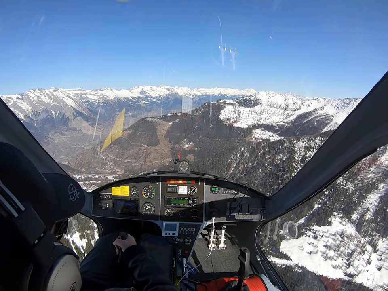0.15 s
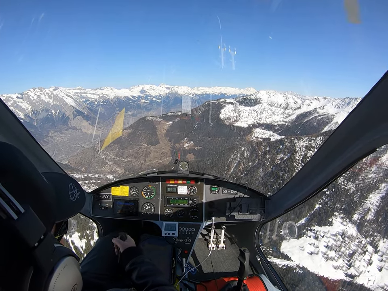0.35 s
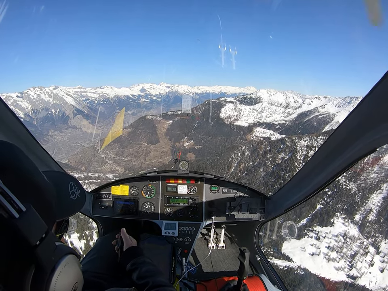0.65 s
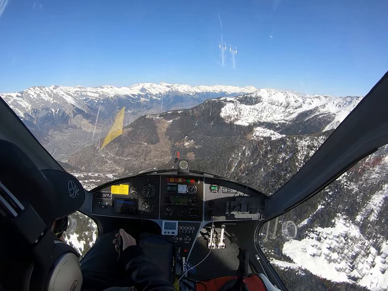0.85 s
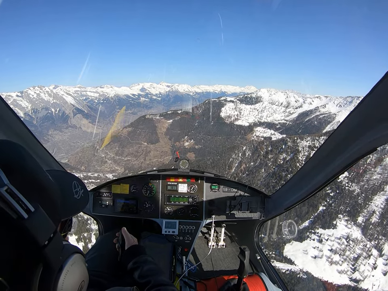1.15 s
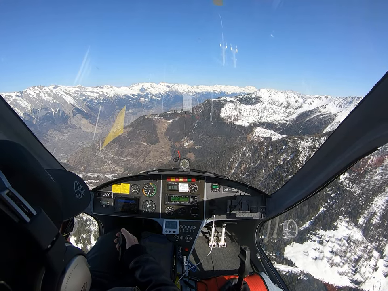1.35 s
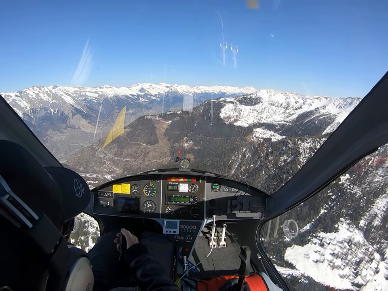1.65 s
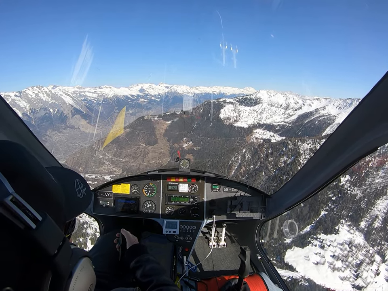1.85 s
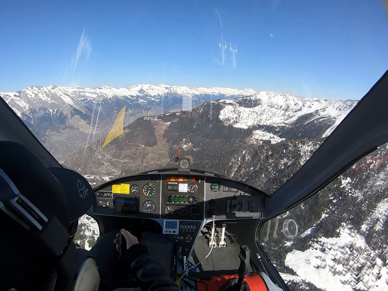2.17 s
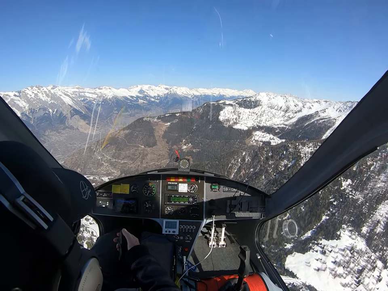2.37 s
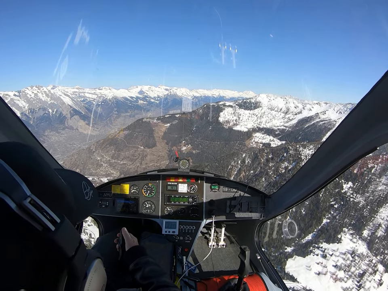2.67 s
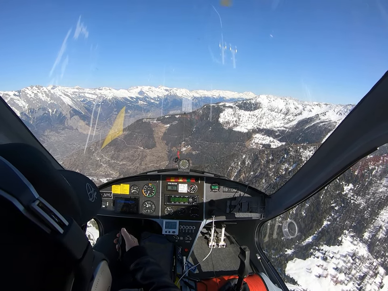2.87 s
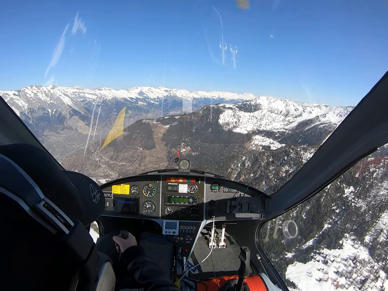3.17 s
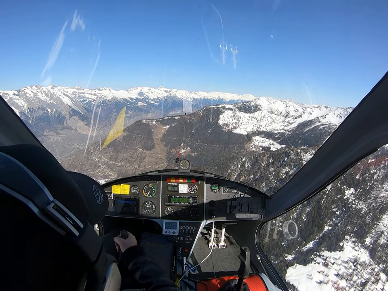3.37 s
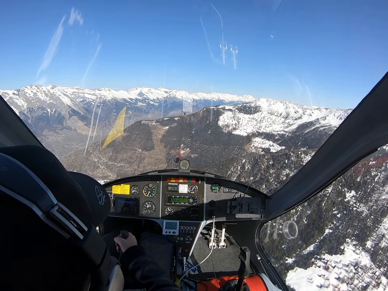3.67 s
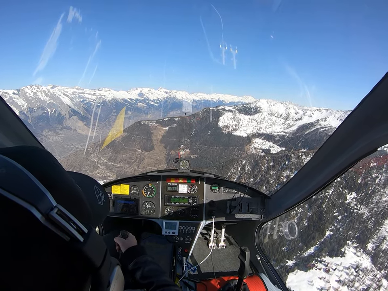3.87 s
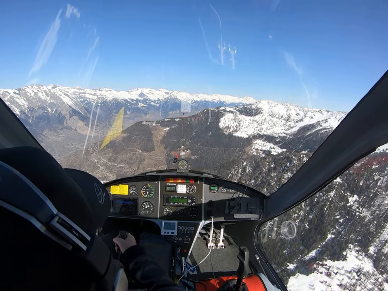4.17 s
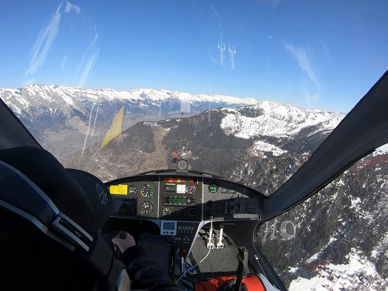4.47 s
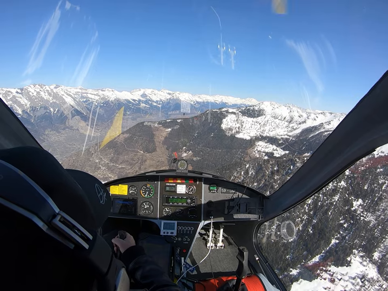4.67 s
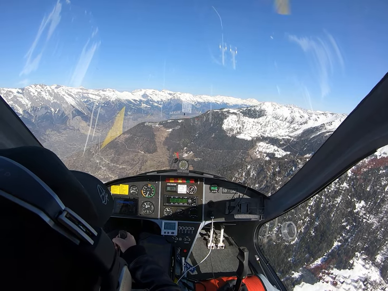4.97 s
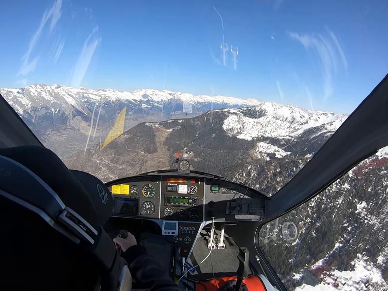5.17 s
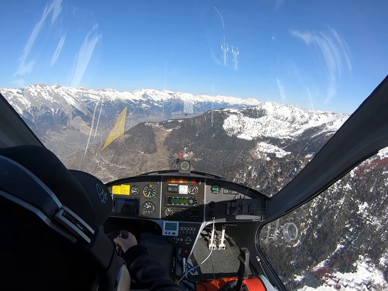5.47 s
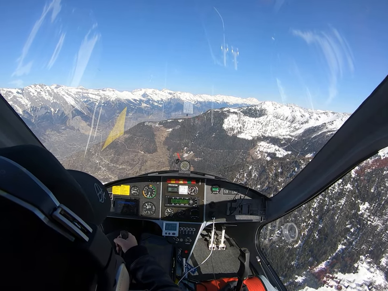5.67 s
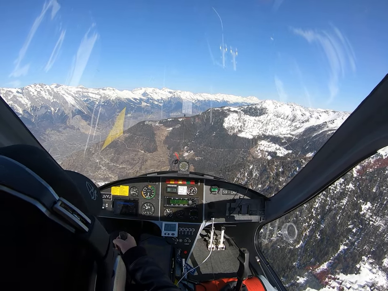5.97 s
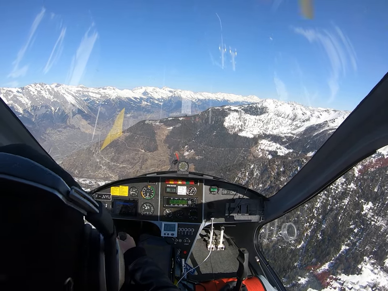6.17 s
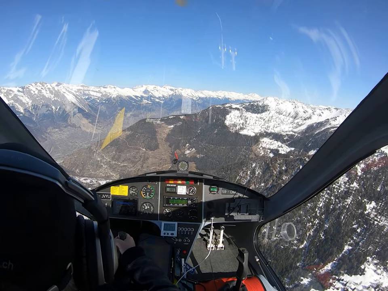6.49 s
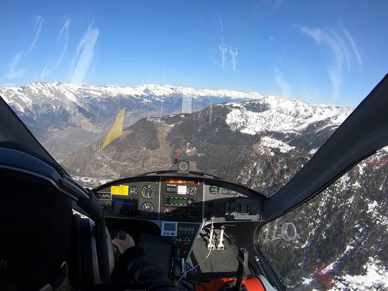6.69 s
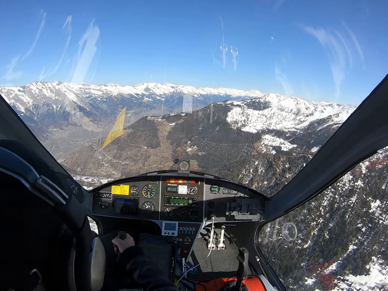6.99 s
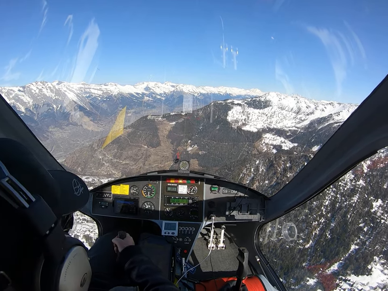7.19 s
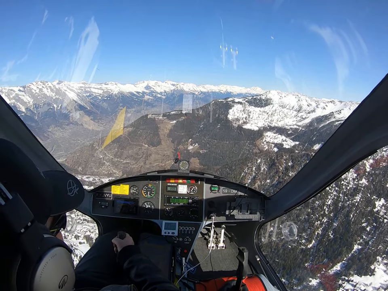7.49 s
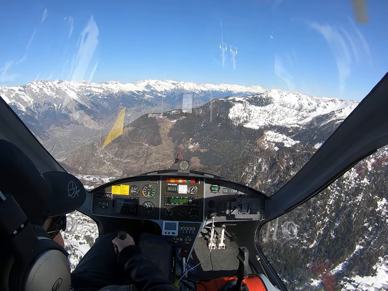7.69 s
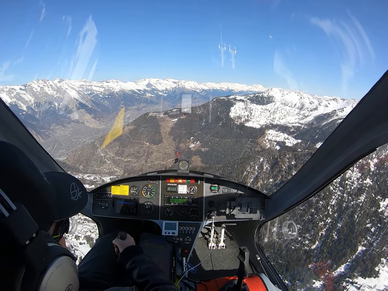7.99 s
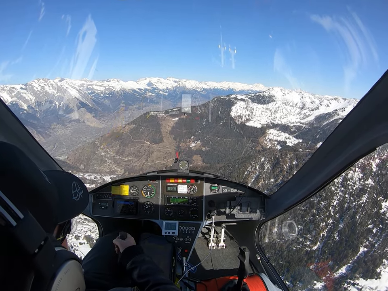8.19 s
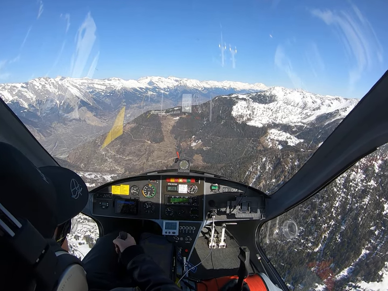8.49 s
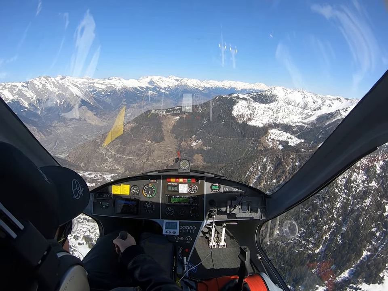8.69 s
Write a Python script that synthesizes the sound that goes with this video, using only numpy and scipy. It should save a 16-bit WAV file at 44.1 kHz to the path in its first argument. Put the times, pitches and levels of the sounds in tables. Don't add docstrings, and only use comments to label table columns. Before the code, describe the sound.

Bright propeller and engine roar with rushing air cuts off after one second in a crackling thump, leaving a low muffled aircraft drone.

```python
import sys
import numpy as np
from scipy import signal
from scipy.fft import rfft, irfft
from scipy.io import wavfile
from scipy.ndimage import uniform_filter1d

SR = 44100
rng = np.random.default_rng(int(sys.argv[2]) if len(sys.argv) > 2 else 0)


def wrap_up_sound(samples):
    columns = np.atleast_2d(samples).T
    tamed = np.clip(columns, -1, 1)
    steps = np.round(tamed * 32767).astype(np.int16)
    wavfile.write(sys.argv[1], SR, steps)


def volts(x):
    e = np.asarray(x, float) / 20
    return 10 ** e


N = 389844
T = np.arange(N) / SR
CUT_S = 1.086


def walk(rate_hz):
    hold = int(SR / rate_hz)
    steps = np.repeat(rng.standard_normal(N // hold + 1), hold)
    return 1.2 * uniform_filter1d(uniform_filter1d(steps, hold), hold)[:N]


def ramp(start_s, length_s):
    return np.clip((T - start_s) / length_s, 0, 1)


def coloured(white, points):
    hz, db = np.transpose(points)
    bin_hz = np.maximum(np.arange(N // 2 + 1) * SR / N, 1)
    gain = volts(np.interp(np.log(bin_hz), np.log(hz), db)) * np.sqrt(SR / 2)
    return irfft(rfft(white) * gain, N)


def tones(turns, table, flutter_db, wobble_turns):
    both = np.zeros((2, N))
    for multiple, open_db, muffled_db in table:
        shake = volts(flutter_db * np.sqrt(multiple) * walk(9))
        wobble = wobble_turns * np.sqrt(multiple) * walk(12)
        wave = shake * np.sin(2 * np.pi * (multiple * turns + rng.random() + wobble))
        both += np.sqrt(2) * volts([[open_db], [muffled_db]]) * wave
    return both


def air(points, blade, throb, gust_db):
    chop = 1 + throb * np.cos(2 * np.pi * blade)
    return coloured(chop * volts(gust_db * walk(25)) * rng.standard_normal(N), points)


def blade_turns():
    slowest_s = 7.05
    sag_hz = 0.208 * np.minimum(T, slowest_s)
    regain_hz = 0.36 * ramp(slowest_s, 1.1)
    return np.cumsum(96.42 - sag_hz + regain_hz) / SR


def propeller(blade):
    # multiple, open_db, muffled_db
    harmonics = [(1, -64, -57), (2, -34.5, -50), (3, -40.5, -63.5), (4, -38, -61.5), (5, -42, -81),
                 (6, -41.5, -71), (7, -49, -80)]
    return tones(blade, harmonics, flutter_db=0.45, wobble_turns=0.007)


def engine(blade):
    # multiple, open_db, muffled_db
    orders = [(0.987, -61.5, -79.5), (3.99, -50.5, -70), (6.06, -50.5, -70.5), (7.96, -54.5, -75.5),
              (12.03, -45.5, -80), (14.13, -44.5, -87), (9, -64.5, -79.5), (18.8, -44.5, -84),
              (19.66, -50.5, -84), (22, -53, -88), (24, -49.5, -99), (33.94, -52, -120), (42, -58, -120)]
    cam_per_blade = 2 * 2.43 / 3 / 4
    return tones(blade * cam_per_blade, orders, flutter_db=0.55, wobble_turns=0.0085)


def rotor():
    # multiple, open_db, muffled_db
    orders = [(1, -76.5, -78), (2, -71, -85), (3, -77.5, -67.5), (5.5, -50.5, -82.5), (10.5, -76, -72.5)]
    rotor_hz = 13.35
    return tones(rotor_hz * T, orders, flutter_db=0.85, wobble_turns=0.03)


def open_air(blade):
    # frequency_hz, level_db (per Hz)
    spectrum = [(25, -84.5), (110, -78), (170, -66), (330, -62), (420, -58), (930, -58.5), (990, -62),
                (1300, -63), (1800, -70.5), (2900, -69.5), (3700, -75), (5000, -89.5), (7300, -102),
                (11000, -106), (16000, -108)]
    return air(spectrum, blade, throb=0.11, gust_db=0.63)


def muffled_air(blade):
    # frequency_hz, level_db (per Hz)
    spectrum = [(20, -88.5), (70, -85), (120, -80), (170, -78.5), (225, -84), (260, -92.5), (350, -86),
                (420, -92), (520, -88.5), (640, -97), (750, -94), (950, -108), (1500, -125)]
    return air(spectrum, blade, throb=0.1, gust_db=0.37)


def hiss():
    # frequency_hz, level_db (per Hz)
    spectrum = [(200, -108), (1200, -110), (3000, -113), (7300, -117), (16000, -120)]
    return coloured(rng.standard_normal(N), spectrum)


def gain_duck_db():
    duck_db, hold_s, release_s = -6.5, 0.174, 0.27
    return duck_db * (1 - ramp(CUT_S + hold_s, release_s))


def ticks(width_s=1.9e-5, rebound=0.2, rebound_s=0.00036):
    # start_s, peak_db
    events = [(1.0812, -30), (1.0955, -35), (1.1023, -36), (1.1048, -24), (1.1826, -50), (2.2227, -46),
              (3.0528, -49), (4.0229, -49), (4.8829, -48), (4.911, -48), (4.9186, -48), (5.853, -52),
              (6.073, -50), (6.683, -52), (7.8634, -45)]
    out = np.zeros(N)
    for start_s, peak_db in events:
        near = slice(int(start_s * SR) - 20, int(start_s * SR) + 200)
        since = T[near] - start_s
        spike = np.exp(-0.5 * (since / width_s) ** 2)
        swing_back = rebound * (since > 2 * width_s) * np.exp(-np.abs(since) / rebound_s)
        out[near] += volts(peak_db) * (spike - swing_back)
    return out


def squelch():
    # start_s, bias_step (full scale), rise_ms
    contact = [
        (1.0841, -0.69, 1.01),
        (1.08737, -0.61, 2.75),
        (1.10247, 0.76, 0.19),
        (1.10318, -1.08, 0.28),
        (1.10391, 0.24, 0.12),
        (1.10483, 1.73, 0.15),
        (1.10539, -2.32, 0.24),
        (1.10644, 2.06, 0.58),
        (1.10861, -0.21, 0.49),
    ]
    coupling_hz, sag, sag_s = 9.76, 0.04, 0.045
    bias = np.zeros(N)
    for start_s, step, rise_ms in contact:
        bias += step * (1 + np.tanh((T - start_s) * 1000 / rise_ms)) / 2
    thump = signal.lfilter(*signal.butter(1, coupling_hz, "high", fs=SR), bias)
    since = np.maximum(T - contact[-2][0], 0) / sag_s
    return thump - sag * since * np.exp(1 - since)


def open_gate():
    fall_s, leak_start_s, leak_rise_s, leak_end_s = 0.0012, 1.091, 0.006, 1.118
    leak_db, fade_db_per_s = -18, 1200
    full = (1 - np.tanh((T - CUT_S) / fall_s)) / 2
    fade_db = fade_db_per_s * np.maximum(T - leak_end_s, 0)
    return full + ramp(leak_start_s, leak_rise_s) * volts(leak_db - fade_db)


def lull_db():
    centre_s, width_s, depth_db = 6.83, 0.69, -1
    return depth_db * np.exp(-((T - centre_s) / width_s) ** 2)


def scene():
    blade = blade_turns()
    open_machine, muffled_machine = propeller(blade) + engine(blade) + rotor()
    microphone = (open_machine + open_air(blade)) * open_gate()
    duck_db = gain_duck_db()
    drone = (muffled_machine + muffled_air(blade)) * volts(duck_db + lull_db())
    ducked_hiss = hiss() * volts(0.28 * duck_db)
    return (microphone + drone + ducked_hiss + ticks() + squelch())[None]


def band_limit(x):
    return signal.sosfilt(signal.butter(12, 15762, fs=SR, output="sos"), x)


def record(dry):
    ceiling = 0.96
    mix = np.clip(dry, -ceiling, ceiling)
    return band_limit(mix)


dry = scene()
out = record(dry)
wrap_up_sound(out)
```